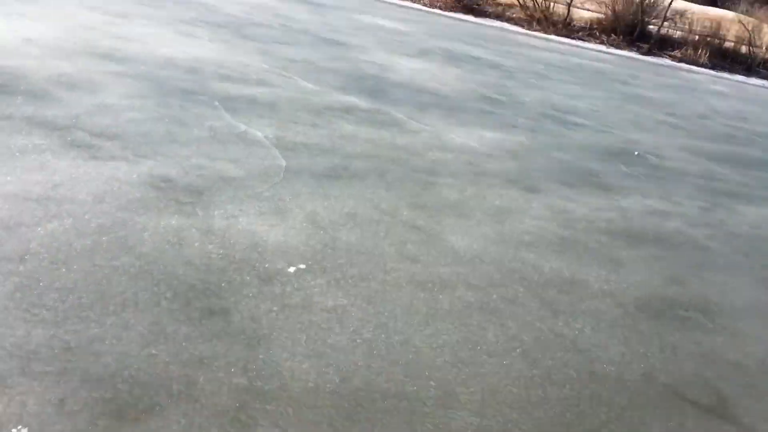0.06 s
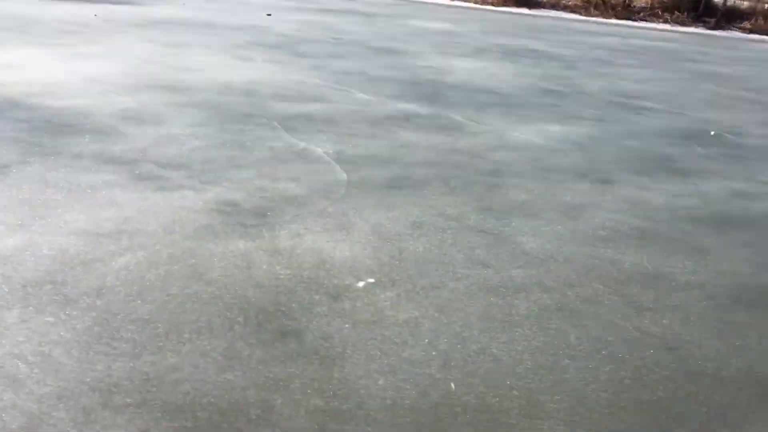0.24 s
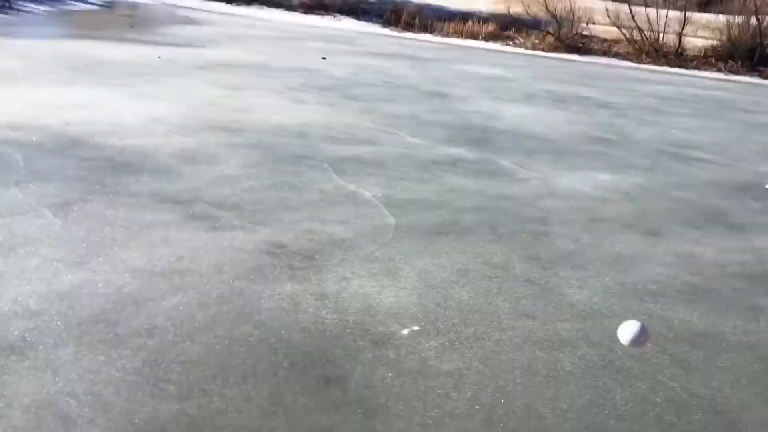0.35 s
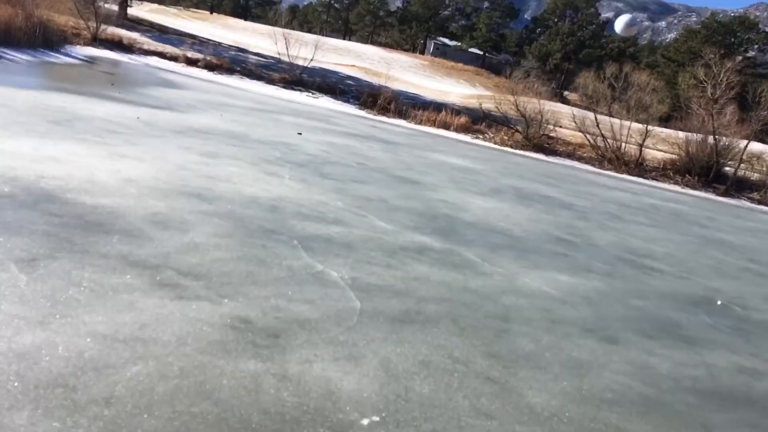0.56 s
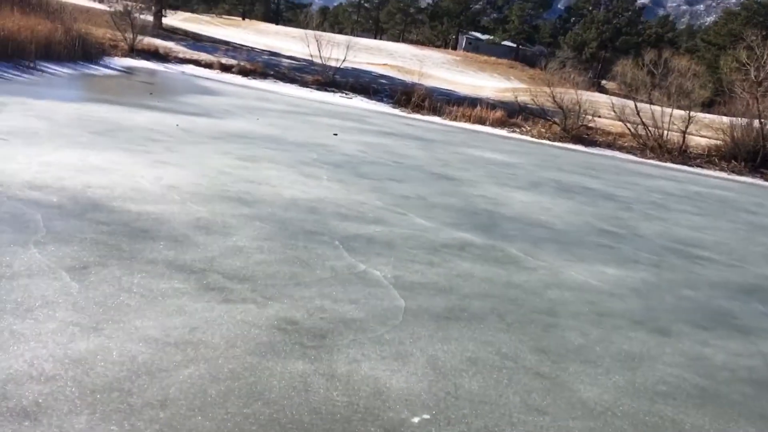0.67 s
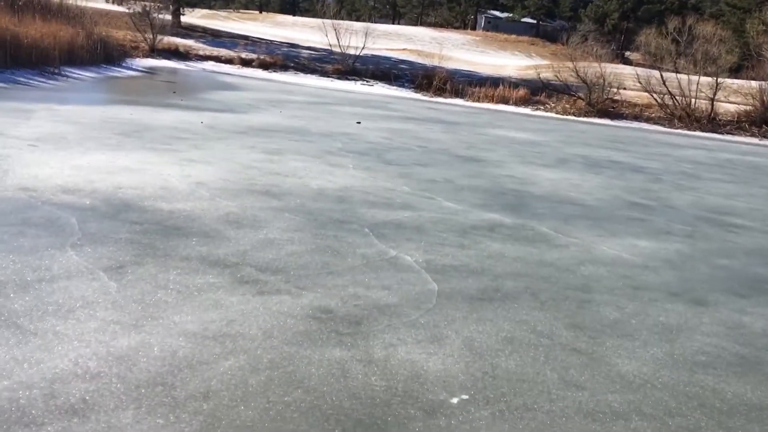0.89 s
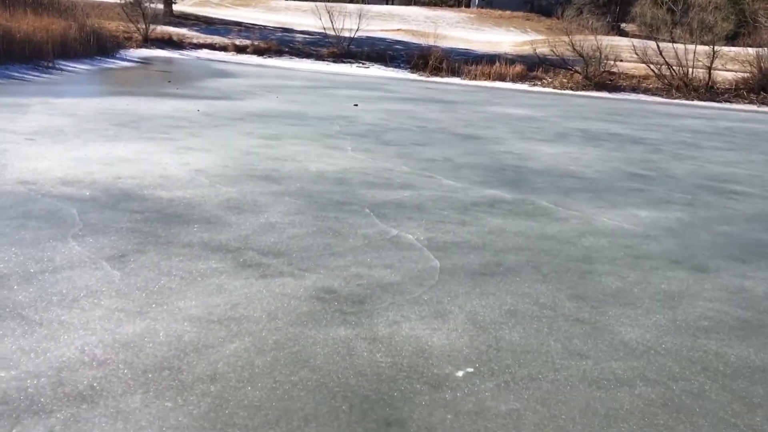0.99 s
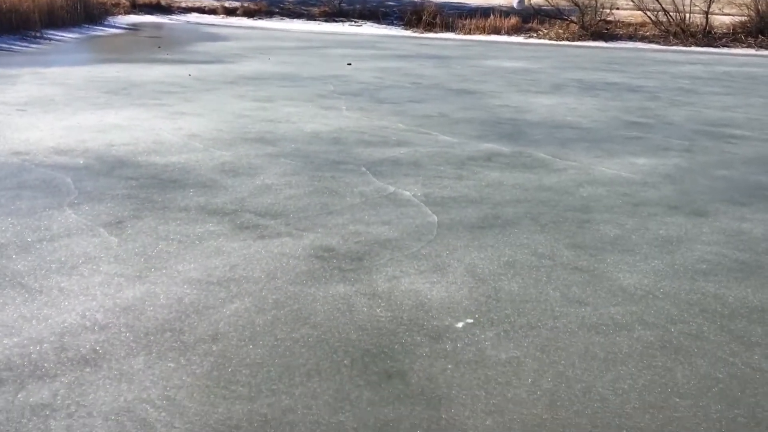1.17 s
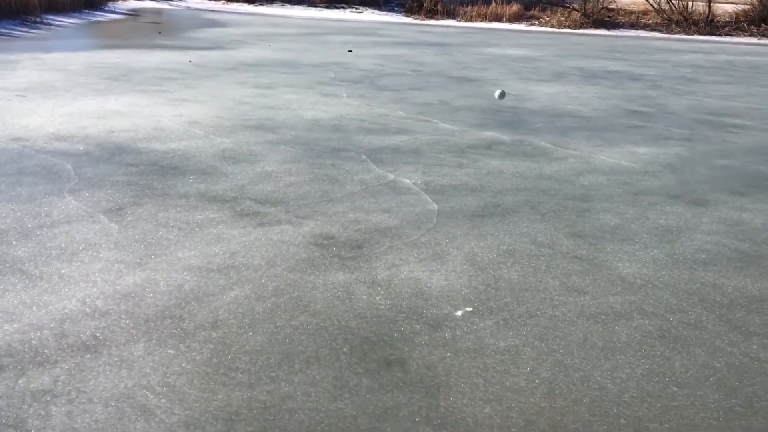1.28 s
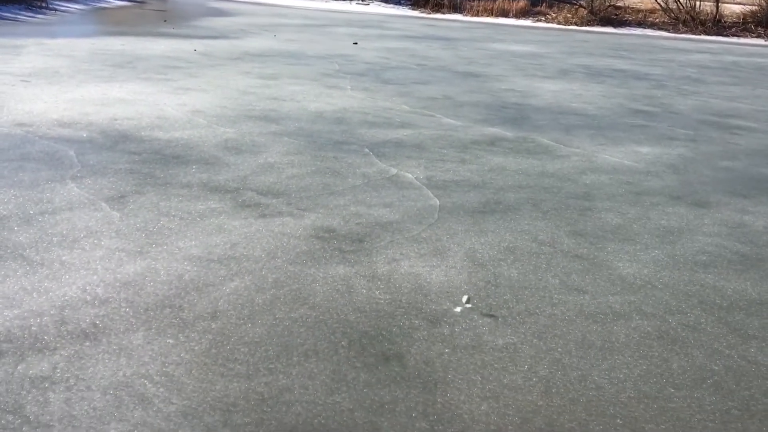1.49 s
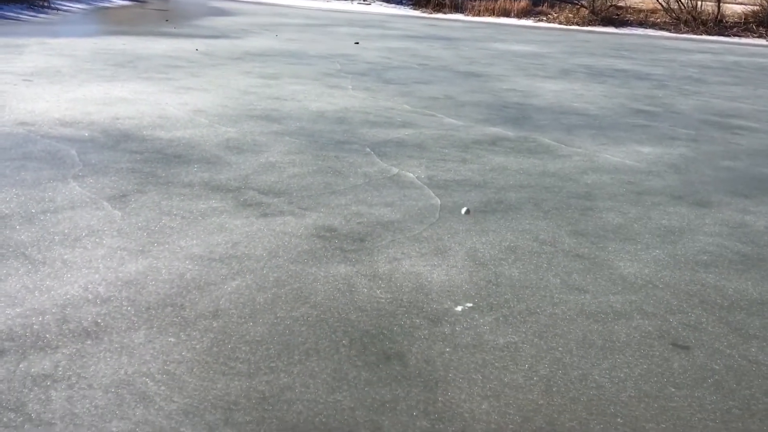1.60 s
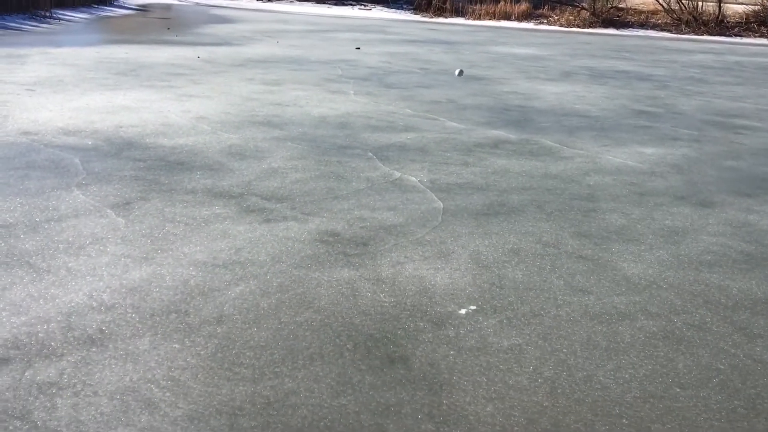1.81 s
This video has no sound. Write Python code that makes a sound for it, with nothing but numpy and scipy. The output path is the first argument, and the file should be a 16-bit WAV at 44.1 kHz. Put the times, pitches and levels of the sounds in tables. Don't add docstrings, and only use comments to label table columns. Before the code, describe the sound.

Loud clacking hit of a hard ball, icy patter, then a short falling chirp off ice

```python
import sys
import numpy as np
from scipy import signal
from scipy.io import wavfile

SR = 44100
rng = np.random.default_rng(int(sys.argv[2]) if len(sys.argv) > 2 else 0)


def output_pcm(signal):
    pcm = np.clip(np.atleast_2d(signal).T, -1, 1) * 32767
    wavfile.write(sys.argv[1], SR, np.round(pcm).astype(np.int16))


def volts(x):
    e = np.asarray(x, float) / 20
    return 10 ** e


N = 81585

# [t/s, level/dB]
WIND_GUSTS = [(0, -42.5), (.1, -48.5), (.19, -27.5), (.24, -40), (.42, -44), (.6, -40), (.72, -47.5),
              (.83, -42), (.93, -33.5), (1.0, -41.5), (1.1, -36), (1.3, -42.5), (1.4, -38), (1.55, -39.5),
              (1.7, -42), (1.85, -42)]
# [f/Hz, density/dB per Hz]
WIND_COLOUR = [(15, -40), (25, -18), (65, 1), (97, -11), (113, -21.5), (178, -17.5), (206, -39.5),
               (400, -36.5), (520, -65.5), (880, -120)]
# [f/Hz, density/dB per Hz]
AIR_COLOUR = [(120, -46.5), (200, -8), (385, -3.5), (618, -11), (1350, -10), (1980, -22), (11800, -29.5),
              (15500, -32.5)]
# [t/s, level/dB]
SWING_LEVEL = [(0, -59), (.07, -53.5), (.085, -50), (.12, -51.5), (.16, -35.5), (.195, -46.5), (.21, -45.5),
               (.43, -64), (.445, -50.5), (.55, -52), (.63, -51.5), (.68, -59), (1.85, -82)]
# [f/Hz, density/dB per Hz]
SWISH_COLOUR = [(71, -31), (120, 4.5), (530, -9), (812, -12), (955, -12.5), (1300, -10.5), (15500, -28)]
# [t/s, level/dB, centre f/Hz]
GRIT_TICKS = [(.044, -36.5, 5500), (.080, -32, 10500), (.086, -33, 5000), (.101, -35, 5000),
              (0.16, -49.5, 10000), (0.2190, -13.5, 3600), (0.2192, -24, 5600), (0.2305, -24, 3000),
              (0.23, -36.5, 6000), (0.321, -46, 8000), (0.342, -22.5, 6050), (.344, -26, 13100),
              (.496, -31, 5000), (0.601, -31.5, 9000), (.626, -29.5, 12000), (0.685, -43, 4500),
              (0.799, -43, 3480), (.990, -45.5, 6940), (1.087, -44.5, 3225), (1.26, -48, 4500),
              (1.287, -46, 3200), (1.420, -40, 11670), (1.135, -44, 4500), (1.27, -44.5, 3500),
              (0.936, -45.5, 5600), (1.173, -47, 6110), (1.285, -47, 12050), (1.311, -48, 13000),
              (1.305, -50, 4990), (1.402, -44, 13100), (1.498, -45, 12460), (1.569, -52, 4020),
              (1.579, -44, 7000), (1.586, -36, 4100), (1.5865, -46, 6500), (0.664, -42, 6000),
              (.680, -49, 8500)]
# [f/Hz, density/dB per Hz]
SPLINTER_COLOUR = [(1500, -40), (3000, -6.5), (6000, -1), (8000, -10), (11700, 1), (13000, -3.5),
                   (15500, -2.5)]
# [t/s, level/dB, t60/s, rise/s]
SPLINTERS = [
    (.2416, -10.5, 0.0078, 0.00028),
    (.2445, -28.5, 0.071, .002),
    (0.1, -53, .25, .003),
    (1.5915, -19.5, 0.0048, 0.00012),
    (1.594, -41.5, 0.07, .002),
]
# [f/Hz, density/dB per Hz]
SHORE_COLOUR = [(180, -32.5), (300, -4), (470, -6.5), (970, -10.5), (6000, -12.5), (11000, -19.5),
                (15500, -19)]
# [t/s, level/dB, t60/s, rise/s]
RING_RETURNS = [
    (.229, -40.5, 0.2, 0.0024),
    (.25, -41.5, 0.39, 0.014),
    (.3, -55, 2.5, 0.013),
    (.331, -46, 0.13, .003),
    (.372, -53, 0.15, 0.0045),
    (.515, -57, .15, .008),
    (.765, -62.5, .1, .004),
    (1.598, -45.5, 0.083, 0.002),
    (1.6, -64, 1.4, .02),
]
# [t/s, level/dB, t60/s, rise/s]
SHORE_RETURNS = [
    (.25, -52, 1.37, .02),
    (1.593, -56.5, 11.6, .005),
]
# [t/s, ring level/dB, thud level/dB]
CONTACTS = [(0.2411, -21, -39.5), (0.2418, -12, -35.5), (0.2424, 3.5, -22.5), (0.2449, -2.5, -1),
            (0.2465, -7, -13.5), (.2480, -5.5, -19), (0.2514, -14.5, -7), (0.2547, -16, -15),
            (.2580, -14.5, -21), (0.2623, -26.5, -24), (.2680, -31, -19), (.275, -33, -27),
            (.284, -38, -27)]
# [f/Hz, level/dB, t60/s]
HEAD_MODES = [(1760, -17.5, 0.02), (2107, -8, 0.0089), (2567, -7.5, .008), (3100, -5, 0.016),
              (3338, -1, 0.025), (3800, -9.5, 0.024), (4304, -7, 0.015), (4687, -8.5, 0.016),
              (5170, -13.5, .015), (5700, -13.5, 0.036), (6200, -10.5, .012), (6900, -18.5, .008)]
# [f/Hz, level/dB, t60/s]
GROUND_MODES = [(148, -10.5, 0.18), (256, 5, 0.033), (400, 5.5, 0.015), (560, -2.5, .016),
                (680, -6.5, 0.018), (840, -4.5, 0.04), (1000, -6, .015), (1205, -12, 0.01)]
# [f/Hz, density/dB per Hz]
CRUNCH_COLOUR = [(88, -30.5), (150, 3.5), (373, -8), (844, -5), (966, -10.5), (1940, -15), (5500, -8.5),
                 (9000, -34)]
# [t/s, level/dB, t60/s, rise/s]
CRUNCHES = [
    (.2447, -10, 0.052, 0.00025),
    (.25, -38, 0.43, .006),
    (.262, -36, 0.12, .004),
    (1.594, -38, 0.053, 0.0018),
]
# [t/s, start f/Hz, end f/Hz,
# length/s, level/dB]
CHIPS = [(0.3188, 2300, 1370, 0.0036, -33.5), (0.345, 1500, 1400, 0.0055, -41),
         (0.374, 1710, 2990, 0.0051, -42), (0.404, 1100, 2380, 0.015, -52), (0.441, 950, 890, 0.018, -30),
         (0.463, 840, 1050, 0.011, -43), (0.471, 840, 890, 0.0063, -37), (0.479, 970, 843, 0.0087, -27),
         (0.485, 874, 960, 0.014, -35), (0.495, 860, 834, 0.014, -50), (0.442, 1560, 1500, 0.012, -53),
         (0.508, 1500, 1200, 0.004, -55), (0.533, 890, 1290, 0.0073, -46), (0.548, 1400, 1600, 0.0035, -46),
         (0.5545, 1500, 1800, 0.006, -43), (0.555, 2140, 2250, 0.008, -42), (0.3, 2100, 1900, 0.0035, -40),
         (0.3215, 1100, 1000, 0.004, -39), (0.605, 2110, 2600, 0.004, -47),
         (0.581, 3300, 3400, 0.0046, -49), (0.564, 5900, 6200, 0.0052, -46),
         (.570, 2600, 3450, 0.0053, -45), (.610, 3260, 4700, 0.0036, -39.5),
         (0.626, 1270, 3800, 0.0084, -41), (.663, 1590, 1600, 0.0047, -48.5),
         (.659, 2300, 2600, 0.0022, -48), (0.678, 570, 570, 0.01, -47)]
# [t/s, f/Hz, level/dB, t60/s]
KNOCKS = [
    (0.4397, 374, -25.5, 0.034),
    (0.446, 194.4, -20, 0.036),
    (0.524, 181, -32, 0.061),
    (0.545, 240, -30, 0.038),
    (0.561, 148, -26, 0.1),
    (0.585, 221, -33, 0.064),
]
# [low f/Hz, high f/Hz, level/dB, t60/s]
SHEET_BANDS = [(666, 1470, -20.5, 0.038), (450, 884, -30.5, 0.18), (315, 486, -39, 0.38),
               (194, 329, -43.5, 0.44)]
# [f/Hz, level/dB, t60/s, polarity]
BALL_MODES = [(3300, 2, 0.014, 0.89), (3800, -0.5, 0.0044, -0.67), (4850, -2, 0.0072, -0.59),
              (5500, -21, 0.0071, 0.94), (6500, 3.5, 0.0022, 0.36), (8000, -14, 0.0048, 0.77),
              (9420, -4, 0.003, 0.97), (11360, -4, 0.0032, 0.99), (13500, -15, 0.0026, -0.74),
              (15800, -16, .003, 0.86)]
# [t/s, start f/Hz, end f/Hz, length/s, level/dB]
BENDS = [
    (1.5925, 1330, 1000, 0.0055, -24.5),
    (1.595, 960, 686, 0.0074, -24),
    (1.602, 660, 790, 0.014, -30.5),
    (1.611, 523, 450, 0.015, -27),
    (1.622, 490, 640, 0.0099, -36),
    (1.633, 560, 440, 0.011, -53),
]

LANDING_S, ECHO_S = 1.586, 1.6912
PATTER_DB = -50


def rms_one(x):
    return x / np.sqrt(np.mean(x ** 2) + 1e-20)


def in_time(rows):
    return np.interp(np.arange(N) / SR, *np.transpose(rows))


def drift(rate):
    r = np.exp(-80 * np.pi * rate / SR)
    slow = signal.lfilter([1], [1, -2 * r, r * r], rng.standard_normal(N // 40 + 2002))[2000:]
    return np.interp(np.arange(N) / 40, np.arange(len(slow)), rms_one(slow))


def ring(s, db, hz, t60):
    clicks = np.full(N, 1e-18)
    np.add.at(clicks, (np.atleast_1d(s) * SR).astype(int), volts(db))
    r = volts(-60 / (t60 * SR))
    w = 2 * np.pi * hz / SR
    return signal.lfilter([0, np.sin(w)], [1, -2 * r * np.cos(w), r * r], clicks)


def band(x, low_hz, high_hz):
    sos = signal.butter(2, [low_hz, min(high_hz, .45 * SR)], "band", fs=SR, output="sos")
    return signal.sosfilt(sos, x)


def noise(spectrum, patchy_db):
    hz, db = np.transpose(spectrum)
    white = rng.standard_normal((2, N + 4000))
    edges = 22 * 2 ** np.arange(0, 10, .5)
    out = 0
    for k, (low, high) in enumerate(zip(edges, edges[1:])):
        level = np.interp(np.log(low * high) / 2, np.log(hz), db, left=-90)
        out = out + volts(level + patchy_db * drift(22)) * band(white[k % 2], low, high)[4000:]
    return rms_one(out)


def bursts(rows):
    start, db, t60, rise = np.transpose(rows)[:, :, None]
    t = np.maximum(np.arange(N) / SR - start, 0)
    return np.sum(volts(db - 60 * t / t60) * (1 - np.exp(-t / rise)), axis=0)


def glides(rows):
    out = np.zeros(N)
    for s, start_hz, end_hz, length, db in rows:
        u = np.linspace(0, 1, int(length * SR))
        phase = 2 * np.pi * np.cumsum(start_hz + (end_hz - start_hz) * u) / SR
        out[int(s * SR):][:len(u)] += volts(db) * np.sin(np.pi * u ** 0.6) * np.sin(phase)
    return out


def wind():
    return volts(in_time(WIND_GUSTS)) * noise(WIND_COLOUR, patchy_db=1.0)


def open_air():
    return volts(-62) * noise(AIR_COLOUR, patchy_db=1.3)


def swing():
    return volts(in_time(SWING_LEVEL) + 0.96 * drift(86)) * noise(SWISH_COLOUR, patchy_db=-3.0)


def grit():
    stray = [(1.55 * a, PATTER_DB - 6 * d, 3000 * 4.5 ** b) for a, b, d in rng.random((24, 3))]
    out = np.zeros(N)
    for s, db, hz in [*GRIT_TICKS, *stray]:
        tick = ring(s, db, hz, 5.0 / hz)
        rebound = ring(s + .0004, db - 6, hz * .85, 5.0 / hz)
        out += band(tick + rebound, hz / 1.5, hz * 1.3)
    return out


def splinters():
    return bursts(SPLINTERS) * noise(SPLINTER_COLOUR, patchy_db=1.0)


def shores():
    white = rng.standard_normal(N)
    tone = rms_one(band(white, 3350 - 125, 3350 + 125))
    overtone = rms_one(band(white, 4500 - 125, 4500 + 125))
    hiss = bursts(SHORE_RETURNS) * noise(SHORE_COLOUR, patchy_db=.6)
    ringing = bursts(RING_RETURNS) * tone + bursts([(.275, -46, .3, .006)]) * overtone
    return hiss + volts(1.5 * drift(40)) * ringing


def blow():
    s, ring_db, thud_db = np.transpose(CONTACTS)
    head, thud = 0, 0
    for hz, db, t60 in HEAD_MODES:
        head = head + ring(s, ring_db + db - 7.5 + rng.normal(0, 2.3, len(s)), hz, t60)
    for hz, db, t60 in GROUND_MODES:
        thud = thud + ring(s, thud_db + db - 10, hz, t60)
    head = band(band(head, 900, 6800), 900, 6800)
    return head + band(thud, 170, 1600)


def crunch():
    return bursts(CRUNCHES) * band(noise(CRUNCH_COLOUR, patchy_db=1.2), 40, 7200)


def chips():
    patter = []
    for a, b, c, d in rng.random((160, 4)):
        hz = 1000 * 6 ** b
        patter.append((.27 + (.665 - .27) * a, hz, hz * (.9 + .4 * c), .003, PATTER_DB - 8 * d))
    return glides([*CHIPS, *patter]) * volts(2.5 * drift(250))


def knocks():
    hits = sum(ring(s, db, hz, t60) for s, hz, db, t60 in KNOCKS)
    return signal.lfilter([.01], [1, -1.8, .81], hits)


def ice_chirp():
    t = np.maximum(np.arange(N) / SR - LANDING_S, 0)
    hz = 560 + (3500 - 560) * np.exp(-t / 0.00147)
    peak_s, rise_s, cut_s = 0.005, 0.0019, 0.0012
    spread = np.where(t < peak_s, rise_s, cut_s)
    shape = np.exp(-((t - peak_s) / spread) ** 2 / 2) * (1 - np.exp(-t / 0.0024))
    return volts(-3.5) * shape * np.sin(2 * np.pi * np.cumsum(hz * (t > 0)) / SR)


def ice_sheet():
    white = rng.standard_normal(N)
    out = 0
    for low, high, db, t60 in SHEET_BANDS:
        tone = rms_one(band(band(white, low, high), low, high))
        out = out + bursts([(LANDING_S + 0.0034, db, t60, .002)]) * tone
    return out


def ball_click():
    s = LANDING_S + 0.0057
    click = sum(sign * ring(s, -9 + db, hz, t60) for hz, db, t60, sign in BALL_MODES)
    return signal.sosfilt(signal.butter(6, 3410, "high", fs=SR, output="sos"), click)


def bending_returns():
    return glides(BENDS) * volts(2.5 * drift(100))


def landing_echo():
    main = ring(ECHO_S, -29, 484, 0.0044)
    return main + ring(ECHO_S, -29 - 6, 920, 0.01) + ring(ECHO_S + 0.0011, -29 - 7.5, 330, 0.029)


def scene():
    soft = wind() + open_air() + swing() + grit() + shores() + chips() + knocks()
    soft = signal.sosfilt(signal.ellip(10, .5, 60, 15950, fs=SR, output="sos"), soft)
    landing = ice_chirp() + ice_sheet() + ball_click() + bending_returns() + landing_echo()
    return (soft + splinters() + blow() + crunch() + landing)[None]


def low_pass(x):
    return signal.sosfilt(signal.butter(12, 16380, fs=SR, output="sos"), x)


def record(dry):
    x = np.clip(dry, -1, 1)
    x = signal.sosfilt(signal.cheby2(10, 60, 16650, fs=SR, output="sos"), x)
    x = signal.sosfilt(signal.butter(3, 38, "high", fs=SR, output="sos"), x)
    return low_pass(x)


dry = scene()
out = record(dry)
output_pcm(out)
```